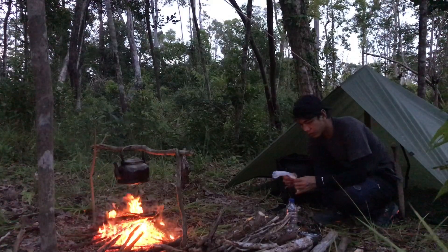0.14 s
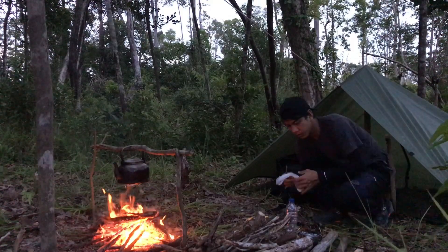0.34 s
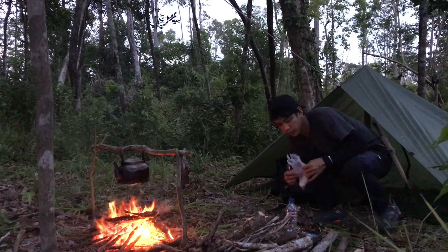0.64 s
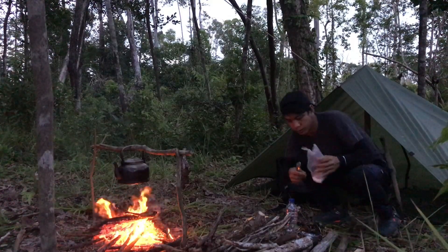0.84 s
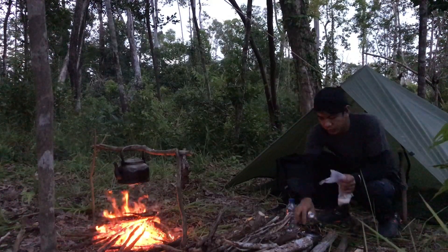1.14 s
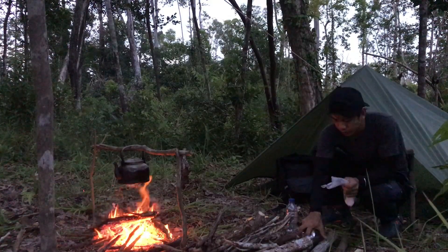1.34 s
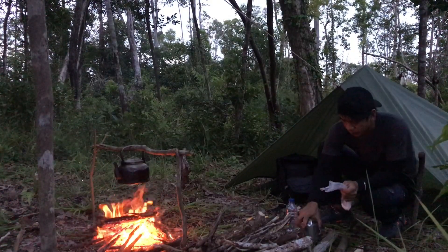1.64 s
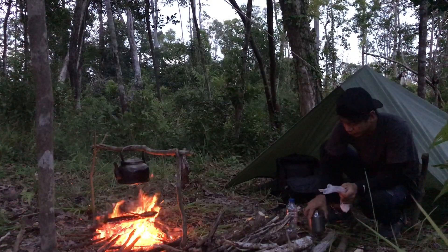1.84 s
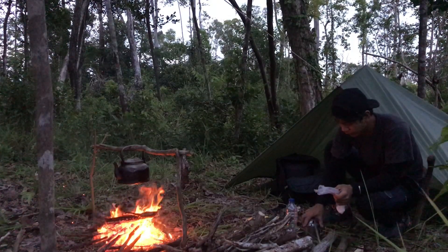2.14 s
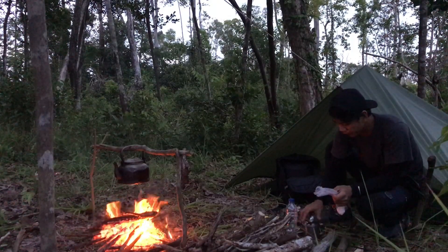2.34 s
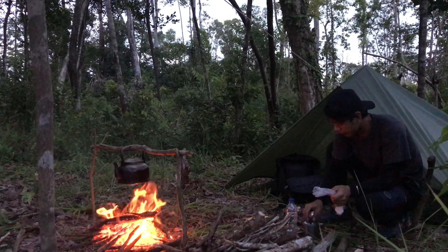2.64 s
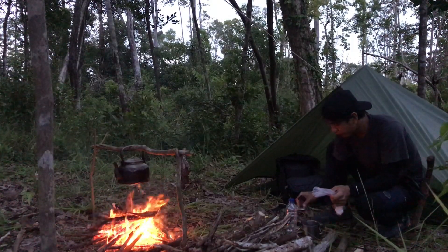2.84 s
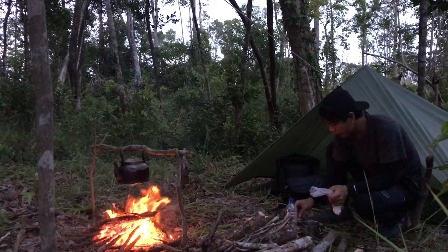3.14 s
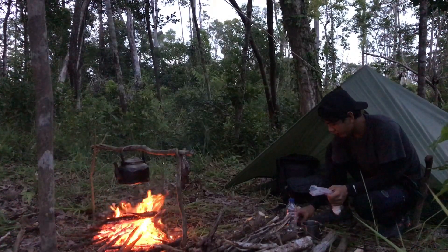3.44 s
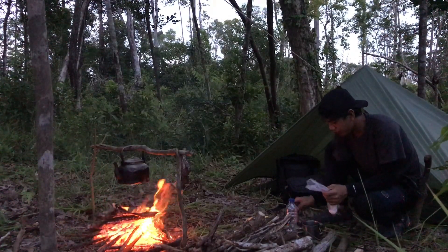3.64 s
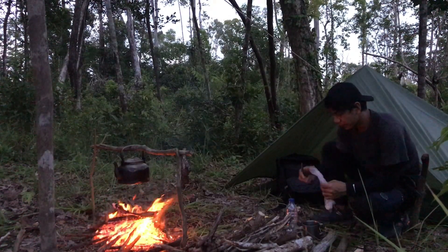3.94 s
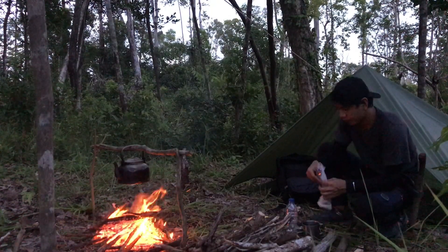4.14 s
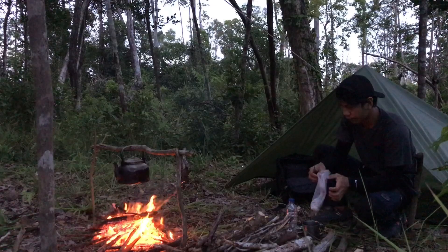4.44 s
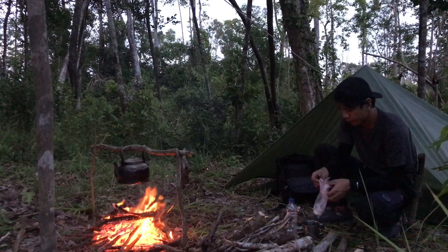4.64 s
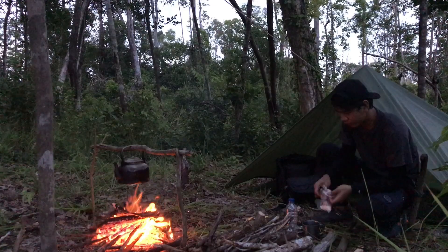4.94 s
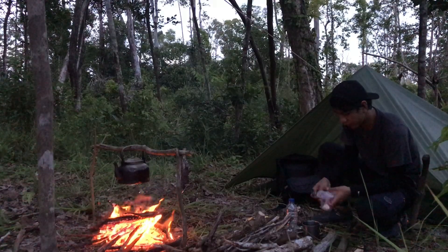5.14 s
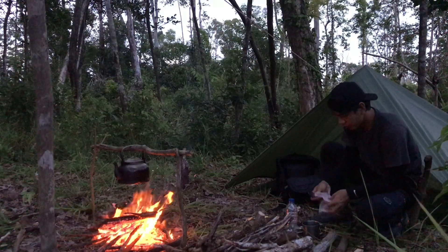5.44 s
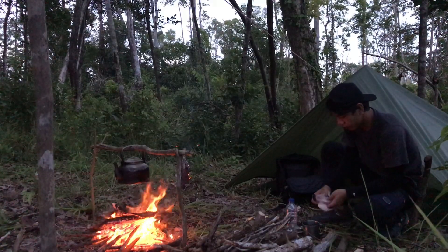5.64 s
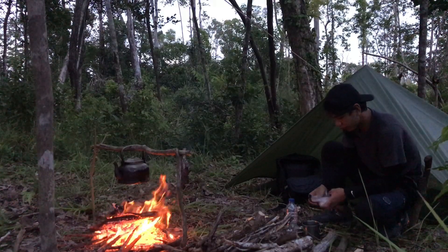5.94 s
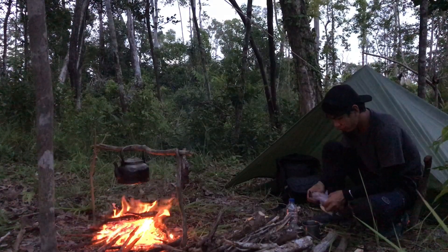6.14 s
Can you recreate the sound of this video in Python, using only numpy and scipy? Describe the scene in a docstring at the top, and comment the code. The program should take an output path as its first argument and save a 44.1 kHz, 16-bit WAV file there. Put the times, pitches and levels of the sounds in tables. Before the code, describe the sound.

Outdoors by a campfire, heard close in mono with only a thin scatter of echo from the trees. First a plastic bag is turned over, crackling; a double stick tap and a hard, bright steel clang follow. A quiet stretch of tiny metallic clinks holds a faint, blurred far animal call. After a sharper wood knock, the bag crumples busily to the end over soft ground thuds, with fire snaps and whirring insects throughout.

```python
"""A forest camp at dusk: insects drone as filtered noise and wavering tones; a fire murmurs and snaps.
First a plastic bag crumples as clumped tiny clicks, then sticks knock and a steel flask rings in modes.
From about two seconds its thin cap clinks, and far off an animal gives one long falling call
of two slurred, scattered notes. The bag is then folded up, with soft low thuds of shifting weight."""
import sys
import numpy as np
from scipy import signal
from scipy.fft import rfft, irfft
from scipy.io import wavfile

SR = 44100
rng = np.random.default_rng(int(sys.argv[2]) if len(sys.argv) > 2 else 0)


def wav_out(sig):
    """Save sig, one row per channel (or a flat mono array), as 16-bit PCM at SR to the path in sys.argv[1]."""
    wavfile.write(sys.argv[1], SR, np.round(np.clip(np.atleast_2d(sig).T, -1, 1) * 32767).astype(np.int16))


N = 277830
TIME = np.arange(N) / SR

# spectrum of the moving plastic film: (f/Hz, relative level per Hz/dB)
BAG_SPECTRUM = [(90, -8), (280, 1.5), (700, -13), (1300, 0), (2000, 1), (3000, -1.5), (4200, 3),
                (5500, -0.5), (8000, -1.5), (9700, -1), (10800, -4.5), (13000, 0), (16000, -4.5)]
# steady working of the bag, first turned over, later folded up:
# one curve each of (t/s, level before the effort gain/dB)
BAG_BOUTS = [
    [(0, -62), (.36, -61.5), (.63, -53.5), (.86, -61), (1.23, -63)],
    [(3.9, -74), (4.24, -56), (4.53, -67.5), (4.62, -52.5), (5.69, -53.5), (5.88, -57.5), (6.3, -57.5)],
]
# separate crunches as the fingers grip it: (t/s, hold/s, level before the effort gain/dB)
BAG_CRUNCHES = [(.02, 0.055, -59.5), (.227, .03, -57), (.569, 0.06, -52.5), (.94, .06, -54.5),
                (4.24, 0.11, -53), (4.666, 0.016, -56), (4.857, 0.031, -49.5), (5.028, .012, -50),
                (5.196, .043, -51), (5.292, 0.022, -50), (5.58, 0.043, -52.5), (5.818, 0.023, -56),
                (6.013, 0.045, -56.5)]
# clear modes of the steel flask: (f/Hz, relative level/dB, t60 before the blow's factor/s)
FLASK_MODES = [(561, -11, .16), (1775, -16, .17), (2568, -7, .1), (2680, -9, .09), (2862, 0, .1),
               (3110, -7, .12), (3195, -6, .13), (4091, -27, .35), (4230, -8, .12), (4424, -5, .09),
               (4480, 0, .12), (5039, -23, .36), (5488, -17, .2), (5990, -22, .3), (6720, -19, .17),
               (7381, -22, .14), (8060, -19, .29), (8760, -12, .14), (9210, -16, .24), (9286, -12, .13),
               (9565, -14, .13), (11610, -10, .11), (11920, -10, .1), (12180, -9, .09), (12866, -10, .11),
               (14342, -10, .1), (15278, -12, .1)]
# the flask's crowd of weaker modes: (f/Hz, relative level per Hz/dB)
FLASK_CROWD = [(110, -6), (160, 2.5), (440, 0), (700, -25), (1200, -2), (2100, 0), (2850, 4), (3600, -1.5),
               (4500, -1), (5900, -3), (7100, -8.5), (9100, 2.5), (10100, -5), (11800, 3.5), (15500, 4.5)]
# blows on the flask: (t/s, level/dB, tilt/dB per octave, factor on ring time)
FLASK_BLOWS = [(1.2617, -20, -0.5, 0.85), (1.265, -24.5, -2, 0.45), (2.457, -48.5, -2, 0.6)]
# modes of the thin cap: (f/Hz, relative level/dB, t60 before the touch's factor/s)
CAP_MODES = [(4070, -6.5, .48), (4250, -7.5, .3), (4540, -2, .2), (6700, -5, .16), (7050, -8, .14),
             (10480, -11, .3), (11010, -10, .45), (11480, 1, .15), (11900, -3, .08), (12480, -3, .18),
             (13360, -9, .33), (14300, -5, .16), (15640, 1, .12)]
# touches of the cap: (t/s, level/dB, f that the contact favours/Hz, factor on ring time)
CAP_TOUCHES = [(2.161, -54, 13000, 0.22), (2.209, -54, 12500, .15), (2.283, -57, 6800, 0.93),
               (2.459, -55, 6500, 0.76), (2.459, -61, 5000, 0.86), (2.662, -63, 5000, 1),
               (2.675, -61, 13500, 0.68), (2.709, -59.5, 4260, 1), (2.7097, -46.5, 13100, 1),
               (3.4135, -50, 11500, .25)]
# dry knocks on wood: sticks knocking together, and the flask set down at 3.41 s: # (t/s, level/dB, centre f/Hz,
# t60/s)
WOOD_KNOCKS = [(0.9092, -39, 1640, 0.015), (.9115, -40, 1550, 0.019), (2.018, -59, 1200, .05),
               (2.131, -54, 1820, 0.044), (2.457, -50, 420, 0.12), (3.406, -42.5, 2700, 0.037),
               (3.4134, -39, 2700, 0.019), (3.4141, -35.5, 1950, 0.019)]
# loudest snaps of the fire and of the bag's creases:
# (t/s, level before the pulse and rattle weights/dB, centre f/Hz)
LOUD_SNAPS = [(.4135, -46, 13000), (0.571, -43, 12000), (.9448, -46, 12000), (1.122, -46, 12000),
              (1.562, -48, 14000), (1.7857, -42.5, 6100), (2.783, -47, 9000), (3.4446, -35, 13000),
              (4.239, -44, 4930), (4.4352, -43, 6000), (4.5037, -45.5, 11000), (4.8353, -37, 6000),
              (5.309, -37, 10000), (5.446, -44, 10000), (5.979, -36.5, 12300)]
# soft thuds of shifting weight: (t/s, level/dB, f/Hz)
WEIGHT_THUDS = [(4.801, -50.5, 56), (5.361, -47.5, 60.7), (5.681, -48, 49), (5.76, -54.5, 104),
                (6.078, -46.5, 71), (6.078, -51.5, 133)]
# the two slurred notes of the far call: (t/s, length/s, starting f/Hz, sag/Hz per s,
# starting level before scatter/dB, swell/dB per s, octave level re fundamental/dB)
CALL_NOTES = [(2.3, 0.71, 746, 32, -69, -16, 5.5), (2.95, 0.33, 705, 150, -76, 32, -6)]
# single insects holding a note: (f/Hz, level at the peak/dB, waver/Hz, swell/dB, peak t/s, bell width/s)
INSECT_SINGERS = [(1970, -73.5, 1.4, 3, 1.5, 0.68), (2178, -61.5, 3.5, 2, 3.8, 1.05),
                  (2184, -62, 5.4, 2, 0.35, 1.4), (2262, -69.5, 3.1, 0.5, 4.1, 2.1),
                  (2373, -63.5, 5.6, 3.5, 8.1, 5.6), (2568, -67.5, 4.6, 4, 1.8, 4.1)]
# insect choruses: (centre f/Hz, half width/Hz, level/dB)
INSECT_CHORUSES = [(2150, 40, -70), (2323, 41, -65.5), (2353, 30, -66), (2496, 75, -69.5), (2532, 53, -70),
                   (2700, 22, -79.5), (2370, 296, -67), (7210, 350, -72), (7740, 230, -73.5),
                   (7950, 68, -82)]
# wash of countless far insects: (f/Hz, relative level per Hz/dB)
INSECT_WASH = [(1500, -26), (1900, 1), (3300, 4), (4200, 1), (4900, -2.5), (5650, 3.5), (6300, -1.5),
               (8700, 0), (10400, -6.5), (11500, -1), (13800, -4.5), (15500, 3)]
# still air and the low murmur of the flames: (f/Hz, relative level per Hz/dB)
MURMUR_SPECTRUM = [(24, -20), (38, -7), (55, -3), (72, -1.5), (95, -6.5), (160, -7), (250, -12),
                   (355, -11.5), (510, -16.5), (800, -21.5), (1600, -22), (1900, -23.5), (2500, -59),
                   (4000, -100)]

LET_GO_S, CRUNCH_RISE_S, CRUNCH_FALL_S = 0.06, 0.012, 0.017  # exponential time constants
SNAP_T60_S = 0.008
NOTE_RISE_S, NOTE_FALL_S = 0.033, 0.08
WASH_DB, MURMUR_DB = -61.5, -59.5
EDGE_HZ = 15780


def amp(db):
    """Decibels to gain."""
    return 10 ** (np.asarray(db) / 20)


def unit(x):
    """Scales to rms 1."""
    return x / np.sqrt(np.mean(x ** 2) + 1e-20)


def add(mix, s, sound):
    """Mixes a sound in at time s."""
    part = mix[max(round(s * SR), 0):][:len(sound)]
    part += sound[:len(part)]


def colour(x, points):
    """Filters x by a spectrum of (f/Hz, level/dB) points, rolled off below the first."""
    hz = np.fft.rfftfreq(len(x), 1 / SR)
    f, db = np.transpose(points)
    gain = amp(np.interp(np.log(hz + 1), np.log(f + 1), db))
    gain *= np.minimum(hz / (f[0] + 1), 1) ** 2
    return irfft(rfft(x) * gain, len(x))


def band(hz, width_hz, size=N):
    """Noise of rms 1 in a bell-shaped band; around 0 Hz it is a slow random drift."""
    f = np.fft.rfftfreq(size, 1 / SR)
    bell = np.exp(-.5 * ((f - hz) / width_hz) ** 2)
    return unit(irfft(rfft(rng.standard_normal(size)) * bell, size))


def fade(t, t60):
    """Exponential decay by 60 dB in t60."""
    return np.exp(-np.log(1000) * t / t60)


def ring(modes, t, stretch, tilt_db=0):
    """Dying modes of a struck object, starting at rms 1."""
    hz, db, t60 = np.transpose(modes)[:, :, None]
    size = amp(db + tilt_db * np.log2(hz / hz.mean()))
    waves = np.sin(2 * np.pi * (hz * t + rng.random(hz.shape)))
    ringing = (size * waves * fade(t, t60 * stretch)).sum(0)
    return ringing / np.sqrt((size ** 2).sum() / 2)


def bag(creases_per_s=3000, spread_db=3.0, clump_db=2, rub=0.57):
    """Tiny creases buckle in clumps, over the hiss of film sliding on film."""
    sizes = amp(spread_db * np.minimum(rng.exponential(1, N), 5.5)) * rng.choice([-1, 1], N)
    creases = sizes * (rng.random(N) < creases_per_s / SR)
    t = TIME[:400]
    fold = rng.integers(0, 8, N)
    # each fold of the film has its own short rattle
    rattles = [unit(rng.standard_normal(len(t)) * fade(t, 0.003)) for _ in range(8)]
    crackle = np.zeros(N)
    for k, rattle in enumerate(rattles):
        crackle += signal.oaconvolve(creases * (fold == k), rattle)[:N]
    film = unit(crackle) + rub * rng.standard_normal(N)
    clumped = film * amp(clump_db * band(0, 67))
    return bag_effort() * unit(colour(clumped, BAG_SPECTRUM))


def bag_effort(gain_db=1.4):
    """The hands work the bag in two bouts; each crunch swells, holds and dies away on top."""
    parts = []
    for bout in BAG_BOUTS:
        s, db = np.transpose(bout)
        outside_s = abs(TIME - np.clip(TIME, s[0], s[-1]))
        parts.append(amp(np.interp(TIME, s, db)) * np.exp(-outside_s / LET_GO_S))
    for s, hold_s, db in BAG_CRUNCHES:
        before = np.maximum(s - TIME, 0)
        after = np.maximum(TIME - s - hold_s, 0)
        parts.append(amp(db) * np.exp(-before / CRUNCH_RISE_S - after / CRUNCH_FALL_S))
    # the parts add as powers
    return amp(gain_db) * np.linalg.norm(parts, axis=0)


def flask(crowd_db=0, crowd_t60=0.18):
    """Steel rings in a few clear modes and a crowd of weak ones."""
    out, t = np.zeros(N), TIME[:SR // 2]
    onset = 1 - fade(t, 0.0014)
    for s, db, tilt_db, stretch in FLASK_BLOWS:
        tilted = [(hz, level + tilt_db * np.log2(hz)) for hz, level in FLASK_CROWD]
        crowd = unit(colour(rng.standard_normal(len(t)), tilted)) * fade(t, crowd_t60 * stretch)
        clear = ring(FLASK_MODES, t, stretch, tilt_db)
        add(out, s, amp(db) * onset * (clear + amp(crowd_db) * crowd))
    return out


def cap(scrape_db=0, scrape_t60=0.067, focus_db=35):
    """Each touch scrapes briefly and rings the modes near the pitch that it favours."""
    out, t = np.zeros(N), TIME[:SR // 2]
    onset = 1 - fade(t, 0.0056)
    for s, db, centre_hz, stretch in CAP_TOUCHES:
        # modes weaken with squared distance in octaves
        modes = [(hz, level - focus_db * np.log2(hz / centre_hz) ** 2, t60)
                 for hz, level, t60 in CAP_MODES]
        scrape = band(centre_hz, 0.29 * centre_hz, size=len(t)) * fade(t, scrape_t60 * stretch)
        add(out, s, amp(db) * onset * (ring(modes, t, stretch) + amp(scrape_db) * scrape))
    return out


def sticks(width=0.37):
    """Dry wood knocks with a broad, quickly damped resonance."""
    out, t = np.zeros(N), TIME[:SR // 8]
    onset = 1 - fade(t, 0.00051)
    for s, db, hz, t60 in WOOD_KNOCKS:
        knock = band(hz, width * hz, size=len(t)) * fade(t, t60)
        add(out, s, amp(db) * knock * onset)
    return out


def snaps(width_hz=2600, ticks_per_s=14, softest_tick_db=-67):
    """Each snap is one sharp pulse with a short rattle; the embers add small random ticks."""
    out, t = np.zeros(N), TIME[:SR // 32]
    pulse_t = t - 1 / width_hz
    for s, db, hz in LOUD_SNAPS:
        pulse = np.exp(-.5 * (2 * np.pi * width_hz * pulse_t) ** 2) * np.cos(2 * np.pi * hz * pulse_t)
        rattle = band(hz, width_hz, size=len(t)) * fade(t, SNAP_T60_S)
        add(out, s, amp(db) * (2 * pulse + .6 * rattle))
    for when, size, pitch in rng.random((round(ticks_per_s * N / SR), 3)):
        tick = band(8000 + 6500 * pitch, 3000, size=len(t)) * fade(t, 0.0062)
        add(out, when * N / SR, amp(softest_tick_db + 20 * size ** 2) * tick)
    return out


def thuds(swell_s=0.011):
    """Feet press the soft ground: a few slow cycles each."""
    out, t = np.zeros(N), TIME[:SR // 4]
    swell = (t / swell_s) ** 2 * np.exp(-t / swell_s)
    for s, db, hz in WEIGHT_THUDS:
        add(out, s, amp(db) * swell * 2 * np.sin(2 * np.pi * hz * t))
    return out


def forest(x, wet_db=-26):
    """Trunks and leaves scatter back a thin, short tail of sparse random echoes."""
    t = TIME[:SR]
    echoes = rng.standard_normal(len(t)) * (rng.random(len(t)) < 3000 / SR)
    tail = echoes * fade(t, .55) * (1 - fade(t, .1))
    return x + amp(wet_db) * signal.fftconvolve(x, tail / np.linalg.norm(tail))[:N]


def far_call(scatter=1.0, waver=0.0067):
    """Each note sags in pitch; its two harmonics are smeared by many paths between the trunks."""
    out = np.zeros(N)
    for s, length, hz, sag_hz_per_s, db, swell_db_per_s, octave_db in CALL_NOTES:
        t = np.clip(TIME - s, 0, length)
        gate = np.minimum(t / NOTE_RISE_S, 1) * np.minimum((length - t) / NOTE_FALL_S, 1)
        pitch_hz = (hz - sag_hz_per_s * t) * (1 + waver * band(0, 24.0))
        turns = np.cumsum(pitch_hz) / SR
        for k, harmonic_db in enumerate((db, db + octave_db), 1):
            # random gain and phase stand for the summed paths
            paths = 1 + scatter * (band(0, 37) + 1j * band(0, 40))
            smeared = (paths * np.exp(2j * np.pi * k * turns)).real
            out += gate * amp(harmonic_db + swell_db_per_s * t) * smeared
    return out


def insects(throb_db=1.04):
    """A few near singers waver on their notes in front of the choruses and the far wash."""
    out = amp(WASH_DB) * unit(colour(rng.standard_normal(N), INSECT_WASH))
    for hz, db, waver_hz, swell_db, peak_s, span_s in INSECT_SINGERS:
        turns = np.cumsum(hz + waver_hz * band(0, 13.0)) / SR
        bout = np.exp(-.5 * ((TIME - peak_s) / span_s) ** 2)
        out += bout * amp(db + swell_db * band(0, 6.4)) * np.sin(2 * np.pi * turns)
    for hz, width_hz, db in INSECT_CHORUSES:
        out += amp(db + throb_db * band(0, 8.7)) * band(hz, width_hz)
    return out


def air(flutter_db=1.51, drone_hz=65, drone_db=-66):
    """The flames' low murmur flutters over a deep drone of narrow-band noise."""
    murmur = unit(colour(rng.standard_normal(N), MURMUR_SPECTRUM))
    fluttering = murmur * amp(flutter_db * band(0, 5.2))
    return amp(MURMUR_DB) * fluttering + amp(drone_db) * band(drone_hz, 4.4)


def scene():
    """Near sounds with the forest's echo, over the far call, insects and air."""
    near = forest(bag() + flask() + cap() + sticks() + snaps() + thuds())
    return (near + air() + insects() + far_call())[None]


def record(dry):
    """A steep low-pass closes the top of the treble."""
    lowpass = signal.firwin(401, EDGE_HZ, window=("kaiser", 8), fs=SR)
    return signal.oaconvolve(dry, lowpass[None], "same", axes=1)


dry = scene()
out = record(dry)
wav_out(out)
```